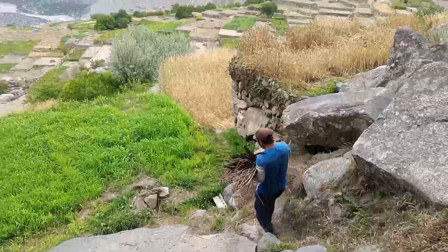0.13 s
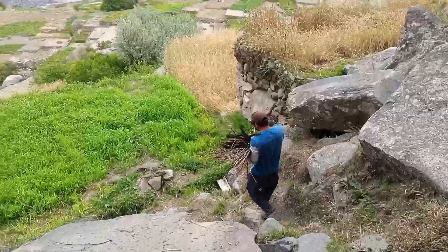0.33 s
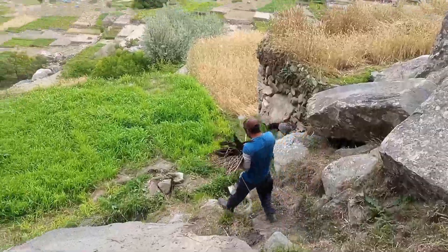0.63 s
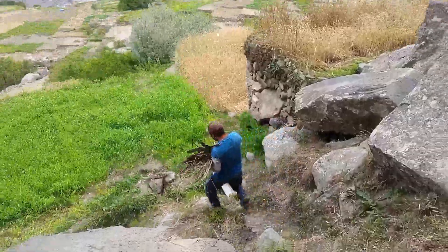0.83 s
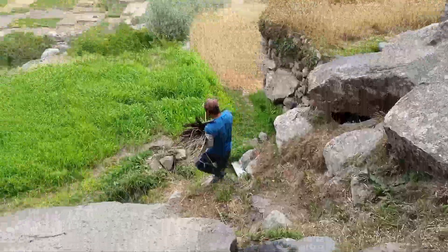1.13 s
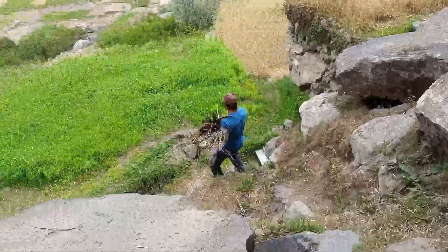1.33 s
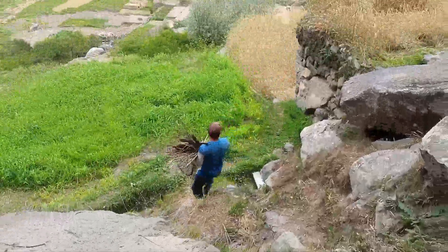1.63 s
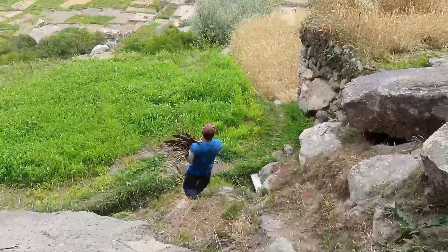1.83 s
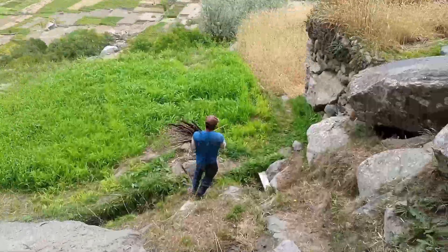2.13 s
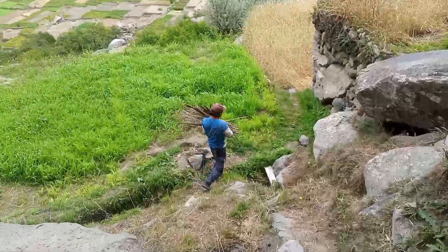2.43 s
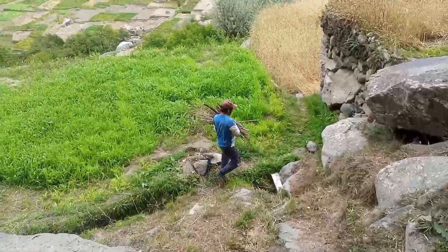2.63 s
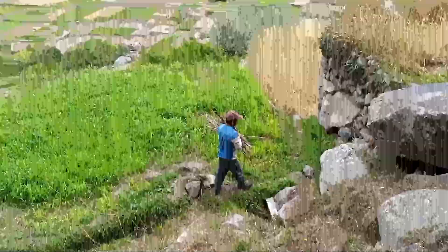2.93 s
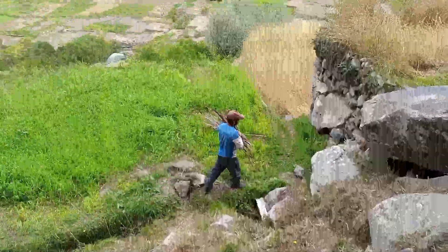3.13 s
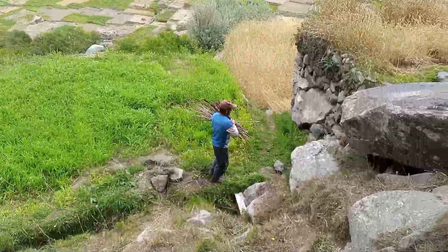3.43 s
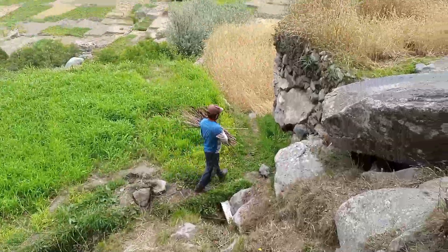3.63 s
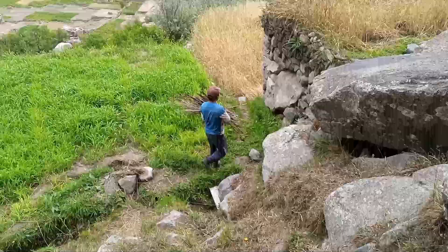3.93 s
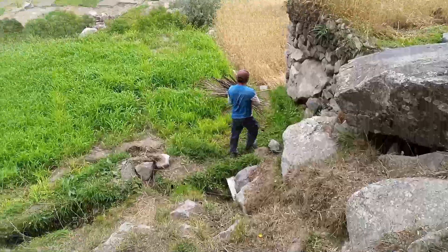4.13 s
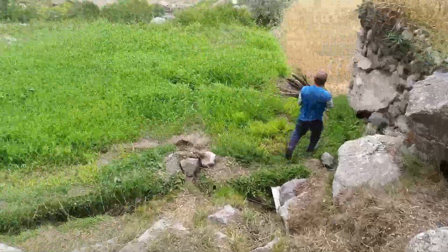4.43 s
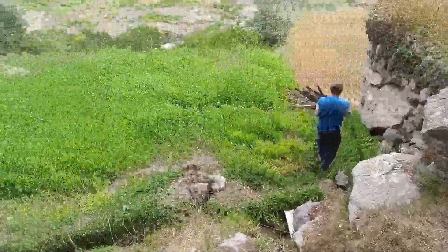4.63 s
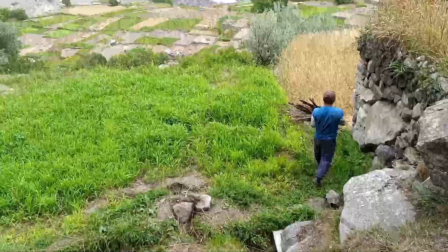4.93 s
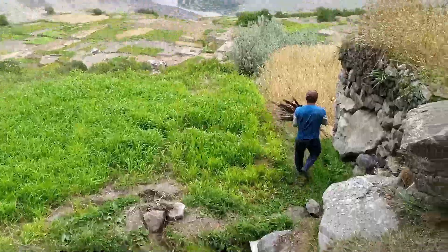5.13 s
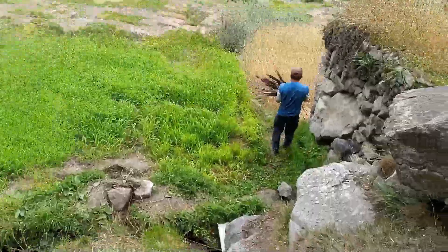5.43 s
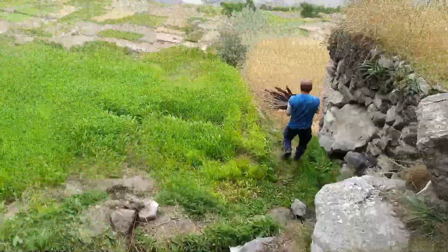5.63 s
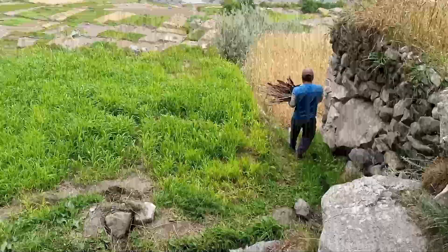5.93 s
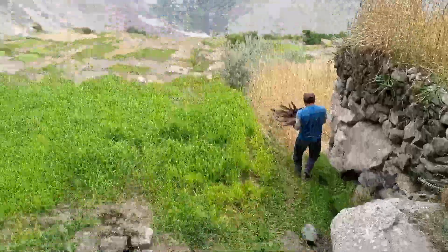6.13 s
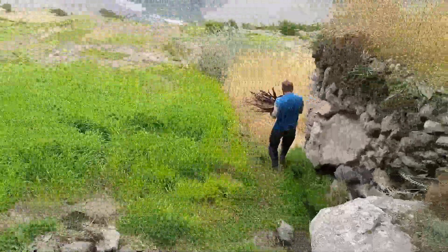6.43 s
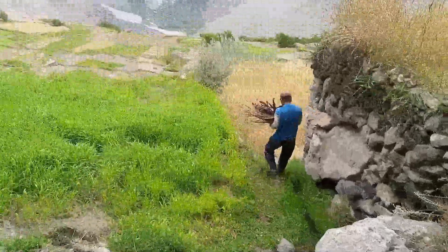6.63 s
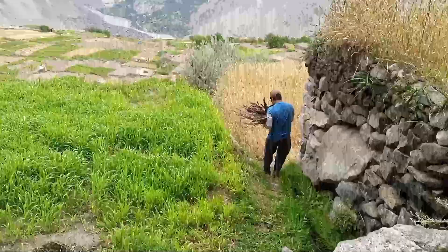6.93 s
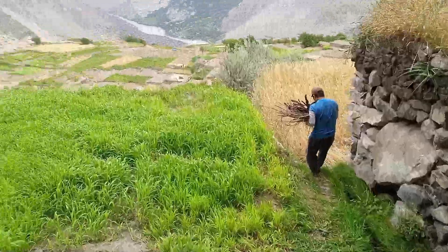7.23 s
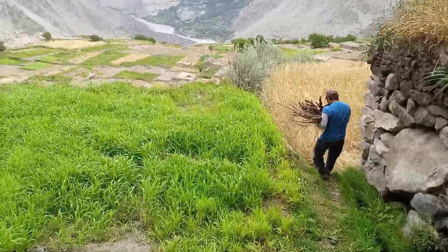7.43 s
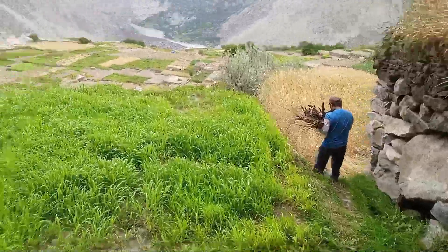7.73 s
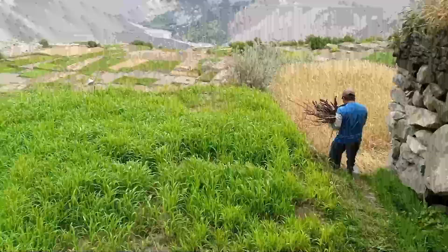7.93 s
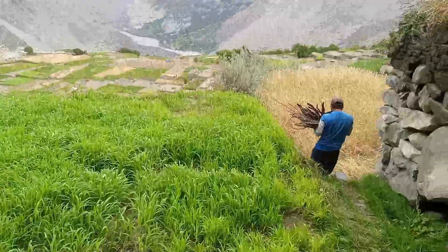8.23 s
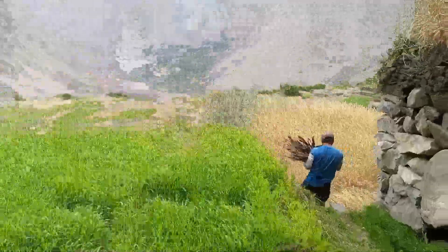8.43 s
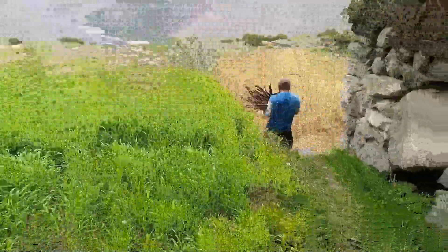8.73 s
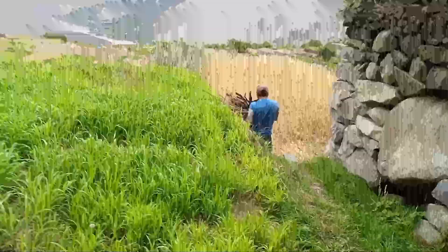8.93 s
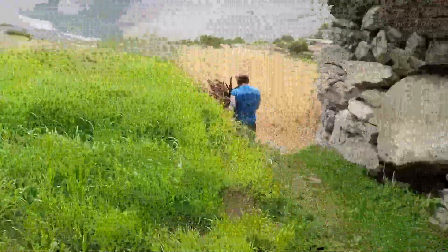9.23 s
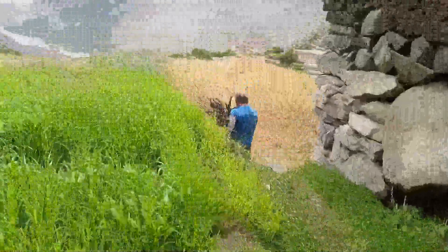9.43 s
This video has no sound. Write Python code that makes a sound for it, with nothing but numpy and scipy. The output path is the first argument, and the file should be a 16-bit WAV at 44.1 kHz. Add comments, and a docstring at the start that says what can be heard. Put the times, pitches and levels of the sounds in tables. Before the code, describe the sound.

Close by, stiff stems scratch against a carried bundle of sticks while someone steps softly through dry grass in a quiet open valley. After a calmer stretch, the grass swishes more strongly and the twigs crackle and creak, building to one loud, brittle snap. The hiss of the grass keeps swelling to the end, with a few woody knocks and light rumbles of air on the microphone.

```python
"""A stony path through tall dry grass in an open valley, walked with a bundle of cut brush by the microphone.
Blades tick by the thousand, and the impulses superpose into a hiss. Stiff stems scrape by stick-slip
friction, which excites their resonant modes; stalks snap, twigs creak and sticks knock together.
Soft steps and puffs of air thud underneath, over the faint rush of the valley."""
import sys
import numpy as np
from scipy import signal
from scipy.fft import rfft, irfft, next_fast_len
from scipy.io import wavfile
from scipy.ndimage import map_coordinates

SR = 44100
rng = np.random.default_rng(int(sys.argv[2]) if len(sys.argv) > 2 else 0)


def wav_out(sig):
    """Save sig, one row per channel (or a flat mono array), as 16-bit PCM at SR to the path in sys.argv[1]."""
    wavfile.write(sys.argv[1], SR, np.round(np.clip(np.atleast_2d(sig).T, -1, 1) * 32767).astype(np.int16))


N = 422919
TIME = np.arange(N) / SR

# Grass brushing past. Each row: time in seconds, base level in dB, brightness in dB per octave.
GRASS_COURSE = [(0.0, -62, -4.5), (0.22, -68.5, 0), (0.38, -57, -2.5), (1.2, -64, -3), (1.8, -60.5, -4.5),
                (2.55, -67, -3.5), (2.8, -62.5, -4.5), (3.9, -60.5, -4), (4.15, -55, -2), (4.8, -57.5, -3),
                (5.25, -55.5, -4), (5.6, -54, -1.2), (6.1, -55.5, -2), (6.55, -52, -4), (6.96, -56, -3),
                (7.2, -49, -2.5), (7.948, -48.5, -1.7), (9.59, -42.5, -2.5)]
# Unevenness of the hiss. Each row: grass level in dB, share of flutter and lone ticks left.
GRAININESS = [(-39.5, 0.55), (-54.5, 0.57)]
# Spectrum of dry blades ticking. Each row: frequency in Hz, relative level in dB.
BLADE_SPECTRUM = [(280, -11), (450, -12), (600, -8), (760, -10.5), (1150, -8.5), (1700, -2.5), (4500, 2),
                  (6600, 4), (7900, 1), (10500, 2.5), (15000, -6)]
# A leg sweeps through a tuft. Each row: time in seconds, rise in level in dB.
SWISHES = [(4.67, 3), (5.12, 7.5), (5.74, 4.5), (8.54, 4.5)]
# Stems dragged across the bundle.
# Each row: start in seconds, length in seconds, level in dB, brightness in dB per octave.
RUBS = [(0.045, 0.013, -44, 10), (0.114, 0.047, -53, 5.5), (0.151, 0.033, -48.5, 8.5),
        (0.249, 0.048, -58, 3.5), (0.66, 0.054, -48.5, -3), (0.71, 0.2, -57.5, 2), (0.899, 0.13, -55.5, 3),
        (1.066, 0.05, -57, 3), (1.128, 0.047, -51, 0), (4.331, 0.014, -42, 6), (4.347, 0.091, -50.5, 1.5),
        (4.477, 0.025, -50.5, -1), (4.563, 0.017, -43, 1), (4.641, 0.074, -53.5, -4),
        (5.384, 0.027, -52, 1), (5.877, 0.05, -49.5, -12.5), (5.969, 0.08, -52.5, 2),
        (6.359, 0.036, -47, 3), (6.43, 0.23, -52, 5), (6.698, 0.23, -52.5, -4.5),
        (7.045, 0.045, -38.5, 2.5)]
# Modes of three stems. Each row: frequency in Hz, bandwidth in Hz before narrowing, relative gain in dB.
THIN_STEM_MODES = [(1735, 60, 5.5), (2330, 180, 3.5), (2590, 230, 0), (3340, 390, -2), (3690, 120, 5),
                   (4820, 300, 2.5), (5750, 240, 1.5), (6500, 4300, -6), (9680, 580, -3.5)]
HOLLOW_STEM_MODES = [(3110, 100, 9), (3520, 89, 6), (3820, 170, 9), (4610, 87, -2), (6660, 1600, -4),
                     (9060, 660, -1.5), (9930, 470, 2.5), (11000, 250, 0)]
THICK_STEM_MODES = [(1080, 34, -12.5), (1580, 55, -9), (2260, 69, 0.5), (2940, 200, 2), (3990, 270, 8.5),
                    (4740, 280, -6), (5730, 240, 5), (6950, 200, -0.5), (9400, 940, -11), (10500, 480, -9)]
# The thick stem ratcheting. Each row: time in seconds, level in dB, brightness in dB per octave.
JERKS = [(5.8762, -34.5, 8), (5.894, -35.5, 2), (5.9004, -41, 2), (5.913, -38.5, 2.5), (5.923, -39, 0),
         (5.931, -42, -1), (5.94, -43, 6), (5.983, -44.5, 6), (6.009, -38, -1.5), (6.025, -42.5, -3),
         (6.035, -37, 0), (6.0427, -38, 2)]
# Dry stalks cracking.
# Each row: time in seconds, decay in seconds, base level in dB, brightness in dB per octave.
SNAPS = [(1.971, 0.0082, -53, 0.5), (2.969, 0.0016, -50.5, -5), (3.743, 0.01, -52.5, -3),
         (3.87, 0.0086, -47.5, 0.5), (3.885, 0.0046, -48, 0), (3.905, 0.0029, -47.5, 6),
         (4.005, 0.0021, -42.5, 4.5), (5.147, 0.0033, -47, -12), (5.303, 0.0012, -53, 17),
         (6.125, 0.0056, -47.5, 0), (6.569, 0.0048, -40, -5), (6.683, 0.0054, -45.5, -2.5),
         (7.0564, 0.0016, -26, 15), (7.0612, 0.0051, -23.5, 8.5), (7.07, 0.0049, -37, -8),
         (7.088, 0.011, -37, -6), (7.376, 0.0041, -42.5, 3), (8.514, 0.0015, -39.5, -4),
         (9.142, 0.0052, -41, -17)]
# The bundle's woody ring under every snap. Each row: frequency in Hz, bandwidth in Hz.
WOOD_MODES = [(1510, 17), (2020, 120), (2620, 110), (3060, 200), (4300, 2500), (6700, 2700)]
# Twigs bending. Each row: middle in seconds, half length in seconds, pitch in Hz, level in dB.
CREAKS = [(3.583, 0.024, 3700, -47), (3.679, 0.052, 3770, -61.5), (4.064, 0.005, 4520, -52.5),
          (4.114, 0.0073, 1740, -50), (5.114, 0.01, 2540, -51.5), (5.206, 0.039, 1770, -54),
          (5.329, 0.034, 2070, -53.5), (5.474, 0.015, 2380, -53), (5.638, 0.0055, 1600, -50.5),
          (5.715, 0.028, 4600, -54.5), (5.982, 0.008, 1530, -49.5), (6.019, 0.022, 1570, -49.5),
          (6.59, 0.048, 700, -61.5), (6.786, 0.015, 1625, -51), (6.844, 0.012, 734, -55.5),
          (7.038, 0.0056, 2610, -38.5), (7.065, 0.016, 1484, -42), (7.067, 0.0098, 2560, -37.5),
          (7.121, 0.014, 1170, -53), (7.385, 0.0092, 1990, -44.5), (9.113, 0.058, 620, -54.5)]
# Sticks of the bundle colliding. Each row: time in seconds, pitch in Hz, level in dB.
KNOCKS = [(2.9355, 2020, -39), (5.128, 1030, -41), (5.855, 2280, -45), (7.788, 1210, -37),
          (8.458, 1690, -34), (8.541, 1160, -39)]
# Soft steps. Each row: middle in seconds, half length in seconds, centre frequency in Hz, level in dB.
FOOTFALLS = [(0.241, 0.028, 365, -64.5), (1.333, 0.024, 362, -57.5), (1.656, 0.016, 224, -59.5),
             (5.161, 0.044, 440, -64.5), (6.222, 0.023, 207, -60.5), (7.817, 0.014, 580, -56.5),
             (8.49, 0.0096, 245, -45.5), (8.557, 0.026, 400, -48.5), (9.137, 0.043, 330, -56)]
# Puffs of air on the microphone. Each row: time in seconds, decay in seconds, level in dB.
PUFFS = [(0.035, 0.031, -45), (0.146, 0.078, -58.5), (0.641, 0.035, -54), (0.866, 0.0098, -45),
         (0.931, 0.03, -59), (1.085, 0.046, -64), (7.649, 0.039, -61.5), (8.38, 0.2, -61.5),
         (9.144, 0.015, -42), (9.23, 0.35, -66), (9.395, 0.017, -52.5)]
# The valley's steady rush. Each row: frequency in Hz, relative level in dB.
VALLEY_SPECTRUM = [(25, -11), (60, -1), (180, 4.5), (520, 1), (750, -6.5), (1150, -8), (1600, -2),
                   (3000, -1.5), (15000, -24)]
# The microphone's treble dip and peak. Each row: frequency in Hz, gain in dB.
MICROPHONE_RESPONSE = [(10500, -0.5), (11800, -4.5), (13200, -8), (14000, -4), (14800, 3), (15400, 5)]

TOP_HZ = 15650  # upper band limit; all rates below are per second


def grass(flutter_db=3.0, blade_rate=17000, spread_db=4.0, tick_rate=60, tick_db=-17, trim_db=-0.5):
    """Shot noise: dense blade ticks superpose into a hiss, coloured by the stalks that are touched."""
    level_db = grass_level(TIME)
    grain = np.interp(level_db, *np.transpose(GRAININESS))
    swarm = unit(ticks(N, blade_rate, spread_db))
    lone_ticks = undb(tick_db) * grain * unit(ticks(N, tick_rate, 1.6))
    hz, moments, spectra = signal.stft(swarm + lone_ticks, SR, nperseg=1024, noverlap=768)
    hz = np.maximum(hz, 1)[:, None]
    times, _, bright_db = np.transpose(GRASS_COURSE)
    colour = contour(hz, BLADE_SPECTRUM) * tilt(hz, np.interp(moments, times, bright_db))
    colour *= stalks(hz, moments) * (hz < TOP_HZ) / (1 + (150 / hz) ** 4)
    colour /= np.sqrt(np.mean(colour ** 2, axis=0))  # equal power at every moment
    _, rustle = signal.istft(spectra * colour, SR, nperseg=1024, noverlap=768)
    return rustle[:N] * undb(level_db + trim_db + flutter_db * grain * walk(N, 50))


def grass_level(s, swish_half_s=0.042):
    """Envelope of the brushing in dB: it grows as the grass thickens and lifts with each swish."""
    times, level_db, _ = np.transpose(GRASS_COURSE)
    return np.interp(s, times, level_db) + sum(db * bell(s - at, swish_half_s) for at, db in SWISHES)


def stalks(hz, moments, spacing_hz=150, change_rate=14):
    """Time-varying filter: passing stalks lend their resonances, the thick, low ones most strongly."""
    depth_db = np.interp(hz, [300, 900, 2500, 7000], [2, 4.2, 3.4, 1.8])
    where = np.broadcast_arrays(hz / spacing_hz, moments * change_rate)
    ripple = map_coordinates(rng.standard_normal((400, 400)), where, order=2, mode="wrap")
    return undb(depth_db * ripple)


def rubs(catch_rate=18000, slip_rate=420, stem_change_s=(2, 5)):
    """Stick-slip friction: bunched catches ring a stem, whose pitches wander as the contact slides."""
    out = np.zeros(N)
    # The stems rub in turn. Each row: modes, scratch gain in dB, depth of the bunching in dB.
    stems = (THIN_STEM_MODES, -25, 2.5), (HOLLOW_STEM_MODES, -21, 5.0), (THICK_STEM_MODES, -15, 5.0)
    for start, length, db, bright_db in RUBS:
        half = length / 2
        middle, t = start + half, event_time()
        modes, scratch_db, slip_db = stems[np.searchsorted(stem_change_s, middle)]
        catches = ticks(len(t), catch_rate, 0.71) * stroke(t, half)
        catches *= undb(slip_db * walk(len(t), slip_rate))
        positions = wavering_positions(len(t), depth=0.0157, rate=30)
        scrape = map_coordinates(stem(catches, modes, scratch_db, bright_db), positions)
        add(out, middle, t, scrape, abs(t) < half, db)
    return out


def stroke(t, half, attack_s=0.0043, release_s=0.0026, swell_db=5, judder_db=3, judder_rate=100):
    """Contact pressure sets a rub's amplitude: it bites, swells with a judder and lets go."""
    held = np.exp(np.minimum(t + half, 0) / attack_s - np.maximum(t - half, 0) / release_s)
    arch_db = -swell_db * np.minimum((t / half) ** 2, 1)
    return held * undb(judder_db * walk(len(t), judder_rate) + arch_db)


def stem(catches, modes, scratch_db, bright_db, uneven_db=2.5, detune=0.015, narrowing=0.33):
    """Modal response: each contact point favours other modes and detunes them; some scratch escapes."""
    chance = rng.standard_normal((len(modes), 2))

    def body(hz):
        ringing = 0
        for (centre, width, db), (favour, shift) in zip(modes, chance):
            mode = resonance(hz, centre * (1 + detune * shift), narrowing * width)
            ringing += undb(db + uneven_db * favour) * mode
        ringing /= 1 + (900 / hz) ** 4 + (hz / 11200) ** 20
        # A harder, brighter contact scratches more.
        scratch = undb(scratch_db + bright_db) * abs(resonance(hz, 11900, 8000)) ** 2
        return (ringing + scratch) * tilt(hz, bright_db)
    return shape(catches, body)


def jerks(half_s=0.0016, catch_rate=16000, scratch_db=-17):
    """Stick-slip under heavy load: the thick stem lets go in jerks, each a tight bunch of catches."""
    out = np.zeros(N)
    for s, db, bright_db in JERKS:
        t = event_time()
        catches = ticks(len(t), catch_rate, 0.62) * bell(t + half_s / 2, half_s)
        add(out, s, t, stem(catches, THICK_STEM_MODES, scratch_db, bright_db), abs(t) < 2 * half_s, db)
    return out


def snaps(fibre_rate=14000, spread_db=6.0, rise_share=0.33, low_cut_hz=1300, ring_db=11, trim_db=0.5):
    """Brittle fracture: a rush of breaking fibres builds fast, dies out and rings the wood around it."""
    out = np.zeros(N)
    for s, decay, db, bright_db in SNAPS:
        t = event_time()
        fibres = ticks(len(t), fibre_rate, spread_db) * burst(t, rise_share * decay, decay)

        def body(hz):
            wood = sum(resonance(hz, centre, width) for centre, width in WOOD_MODES)
            return (1 + undb(ring_db) * wood) * tilt(hz, bright_db) / (1 + (low_cut_hz / hz) ** 6)
        add(out, s, t, shape(fibres, body), (t >= 0) & (t < decay), db + trim_db)
    return out


def creaks(sharpness=9, slip_db=3, slip_rate=307.6, grit_rate=1800, grit_db=-7):
    """Forced vibration: a bending twig chatters on one damped, wavering mode while its bark crumbles."""
    out = np.zeros(N)
    for s, half, pitch, db in CREAKS + lesser_twigs():
        t = event_time()
        pressure = bell(t, half) * undb(slip_db * walk(len(t), slip_rate))
        catches = ticks(len(t), 8000, 0.45) * pressure
        chatter = shape(catches, lambda hz: abs(resonance(hz, pitch, pitch / sharpness)) ** 2)
        chatter = map_coordinates(chatter, wavering_positions(len(t), depth=0.0252, rate=35))
        crumbs = ticks(len(t), grit_rate, 2.7) * pressure
        grit = shape(crumbs, lambda hz: resonance(hz, 1.5 * pitch, 2 * pitch) ** 2)
        add(out, s, t, unit(chatter) + undb(grit_db) * unit(grit), abs(t) < half, db)
    return out


def lesser_twigs(from_s=5, rate=4.0, half_s=0.0062, centre_hz=1744, octaves=0.84, over_grass_db=-3):
    """A random point process: faint creaks in the tall grass, louder where it is thick; rows as CREAKS."""
    gap, height, length = rng.random((64, 3)).T
    times = from_s + np.cumsum(2 * gap / rate)
    pitches = centre_hz * 2 ** (octaves * (2 * height - 1))
    rows = zip(times, half_s * (.5 + length), pitches, grass_level(times) + over_grass_db)
    return [row for row in rows if row[0] < TIME[-1]]


def knocks(sharpness=3.9, rattle_s=0.0093, rattle_db=-20, bark_db=-19):
    """Damped impact: two sticks meet in one round tock, then rattle briefly as they settle."""
    out = np.zeros(N)
    for s, pitch, db in KNOCKS:
        t = event_time()
        rattle = ticks(len(t), 3000, 2.1) * (t > 0) * np.exp(-abs(t) / rattle_s)
        force = (t == 0) + undb(rattle_db) * rattle

        def body(hz):
            tock = abs(resonance(hz, pitch, pitch / sharpness)) ** 2
            return tock + undb(bark_db) * resonance(hz, pitch, 2 * pitch) ** 2
        add(out, s, t, shape(force, body), abs(t) < 2 / pitch, db)
    return out


def footfalls(breadth=3.9, cutoff_ratio=1.73):
    """Overdamped impact: a step is a soft push of low noise, with no ring and no treble."""
    out = np.zeros(N)
    for s, half, centre, db in FOOTFALLS:
        t = event_time()
        width = breadth * centre * np.sqrt(centre / 160)
        cutoff = cutoff_ratio * centre
        push = noise(len(t), lambda hz: abs(resonance(hz, centre, width)) ** 2 / (1 + (hz / cutoff) ** 6))
        add(out, s, t, push * bell(t, half), abs(t) < half, db)
    return out


def air(valley_db=-68.0, calm_db=-87.5, gust_db=4, attack_s=0.015):
    """Flow noise: the valley rushes faintly, and a breeze rumbles on the microphone in puffs."""
    def rumble(count):
        return noise(count, lambda hz: resonance(hz, 83.2, 45.4) ** 2)
    valley = noise(N, lambda hz: contour(hz, VALLEY_SPECTRUM)) * undb(valley_db)
    out = valley + rumble(N) * undb(calm_db + gust_db * walk(N, 3.6))
    t = np.arange(-SR // 10, SR) / SR
    for s, decay, db in PUFFS:
        add(out, s, t, rumble(len(t)) * burst(t, attack_s, decay), (t > -attack_s) & (t < decay), db)
    return out


def ticks(count, rate, spread_db):
    """Poisson impulses: tiny fractures at random moments, many weak and a few strong."""
    happens = rng.random(count) < rate / SR
    strength = undb(spread_db * np.minimum(rng.exponential(size=count), 4.5))
    return happens * strength * rng.choice([-1, 1], count)


def noise(count, response):
    """Filtered Gaussian noise of rms 1."""
    return unit(shape(rng.standard_normal(count), response))


def walk(count, rate):
    """Random modulation with a spread near 1 that turns rate times a second."""
    points = rng.standard_normal(4096)
    return 1.2 * np.interp(np.arange(count) / SR * rate, np.arange(len(points)), points)


def wavering_positions(count, depth, rate):
    """Frequency modulation: sample positions that advance at a wandering speed."""
    slide = np.cumsum(depth * walk(count, rate))
    return [np.arange(count) + slide - slide[count // 2]]


def bell(t, half):
    """Gaussian envelope with standard deviation half."""
    return np.exp(-(t / half) ** 2 / 2)


def burst(t, attack, decay):
    """Exponential growth up to t = 0, then exponential decay."""
    return np.exp(np.minimum(t, 0) / attack - np.maximum(t, 0) / decay)


def resonance(hz, centre, width):
    """Response of a damped oscillator, gain 1 at its centre."""
    return 1 / (1 + 1j * (hz ** 2 - centre ** 2) / (hz * width))


def tilt(hz, slope_db):
    """Spectral slope in dB per octave, pivoting in the middle of the treble."""
    return undb(slope_db * np.log2(np.clip(hz, 1000, 14000) / 4500))


def contour(hz, points):
    """Gain interpolated through (Hz, dB) points along log frequency."""
    point_hz, db = np.transpose(points)
    return undb(np.interp(np.log(hz), np.log(point_hz), db))


def shape(x, response):
    """Linear filter: multiply the spectrum by a function of frequency."""
    size = next_fast_len(len(x))
    hz = np.maximum(np.arange(size // 2 + 1) * SR / size, 1)
    return irfft(rfft(x, size) * response(hz), size)[:len(x)]


def event_time():
    """Time axis in seconds, centred on an event."""
    return np.arange(-12288, 12288) / SR


def add(out, s, t, sound, core, db):
    """Superpose a sound at time s, scaled so that its core has the given rms level."""
    where = round(s * SR) + np.round(t * SR).astype(int)
    inside = (where >= 0) & (where < N)
    gain = undb(db) / np.sqrt(np.mean(sound[core] ** 2) + 1e-30)
    out[where[inside]] += gain * sound[inside]


def undb(db):
    """Decibels to amplitude ratio."""
    return 10 ** (np.asarray(db) / 20)


def unit(x):
    """Scale to rms 1."""
    return x / np.sqrt(np.mean(x ** 2) + 1e-30)


def scene():
    """Superposition: all sources sum at one microphone, the same in both channels."""
    mono = grass() + rubs() + jerks() + snaps() + creaks() + knocks() + footfalls() + air()
    return np.array([mono, mono])


def record(dry):
    """Frequency response: the microphone colours the top octave, and a steep low-pass ends the treble."""
    coloured = np.array([shape(channel, lambda hz: contour(hz, MICROPHONE_RESPONSE)) for channel in dry])
    low_pass = signal.ellip(12, .2, 80, TOP_HZ, fs=SR, output="sos")
    return signal.sosfilt(low_pass, coloured)


dry = scene()
out = record(dry)
wav_out(out)
```